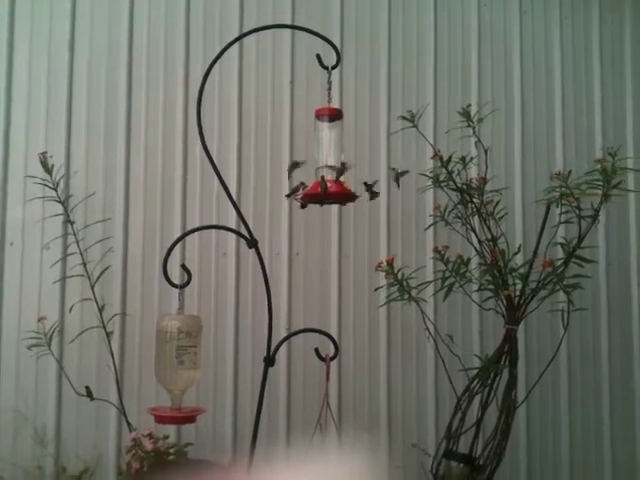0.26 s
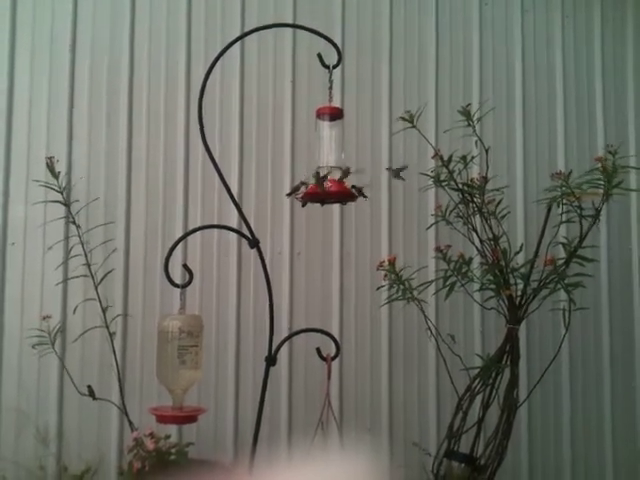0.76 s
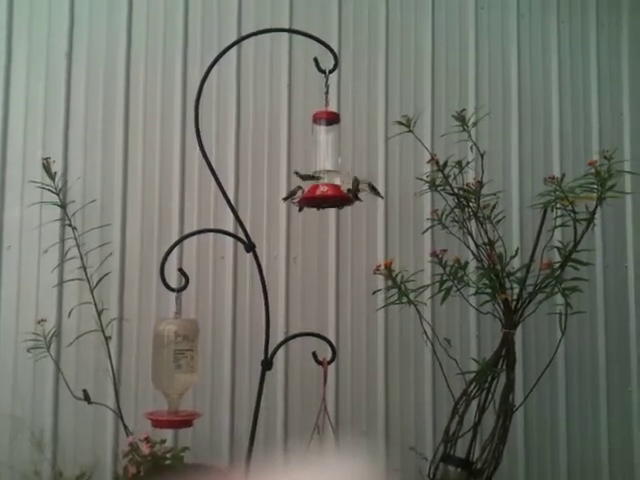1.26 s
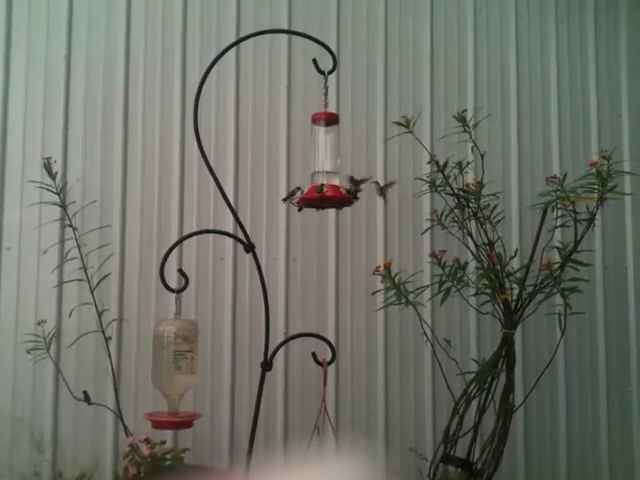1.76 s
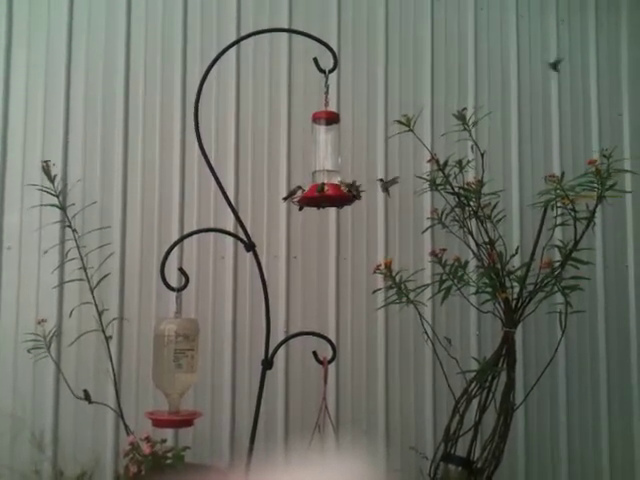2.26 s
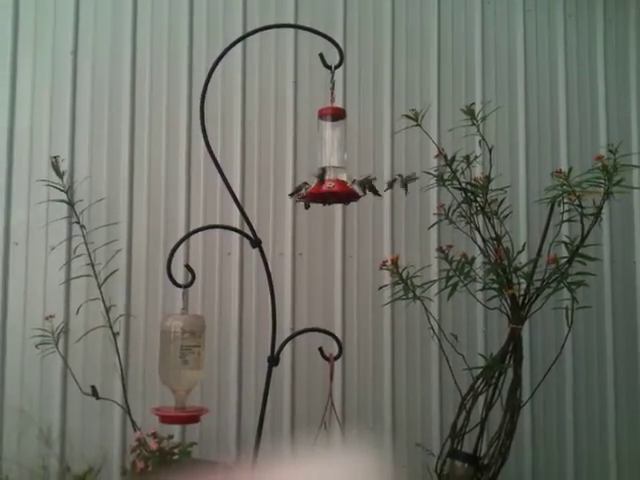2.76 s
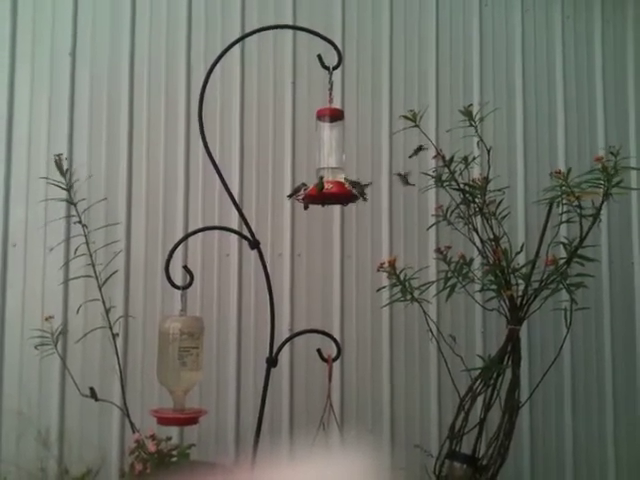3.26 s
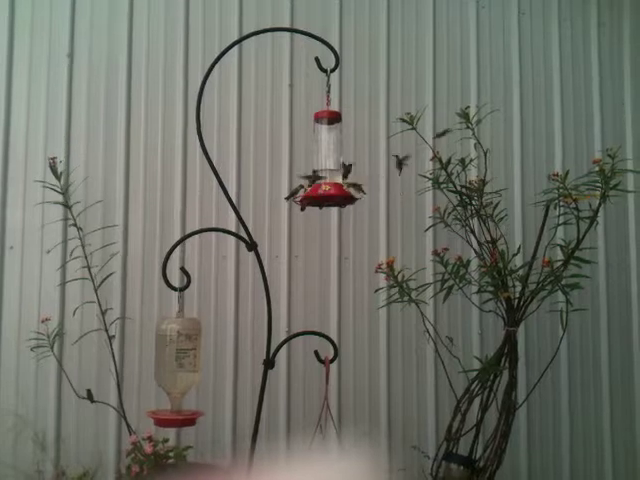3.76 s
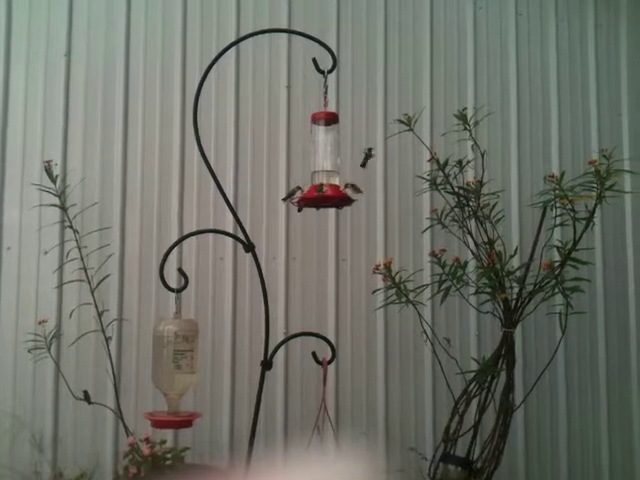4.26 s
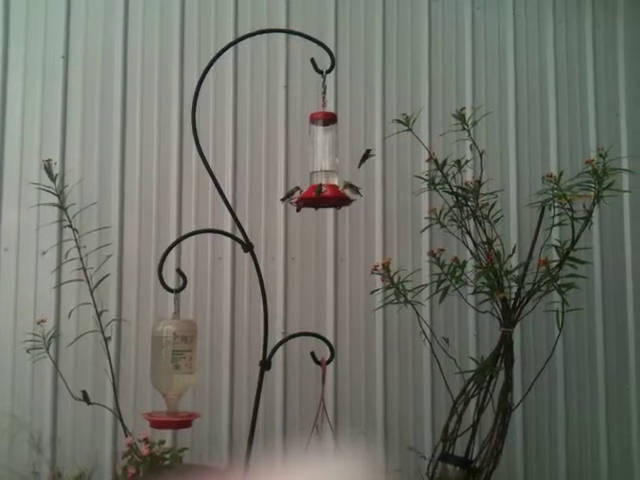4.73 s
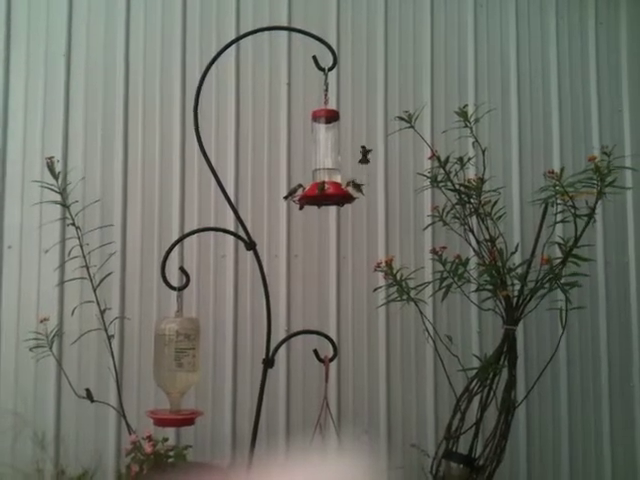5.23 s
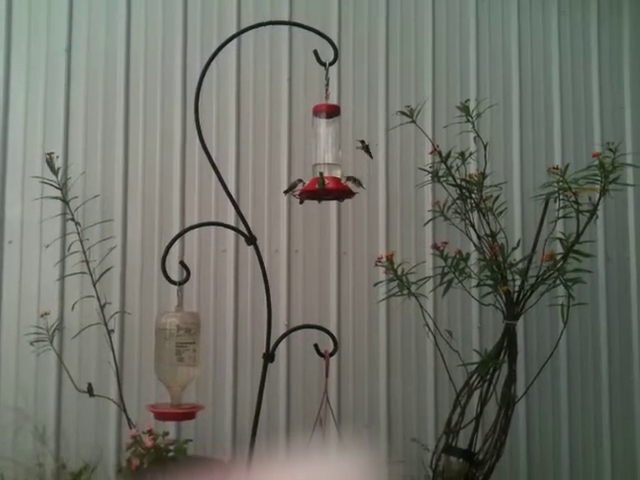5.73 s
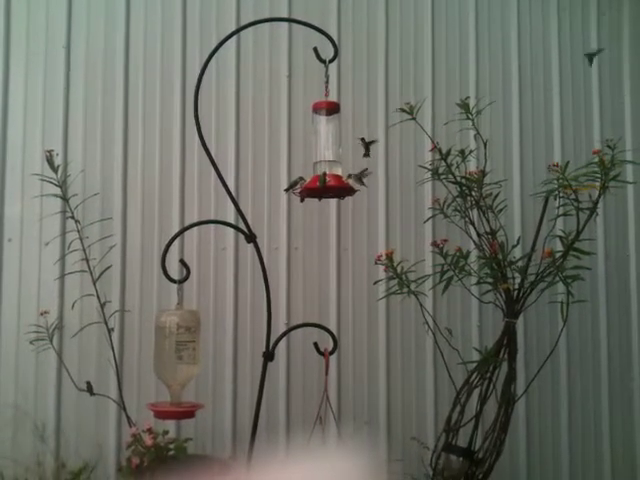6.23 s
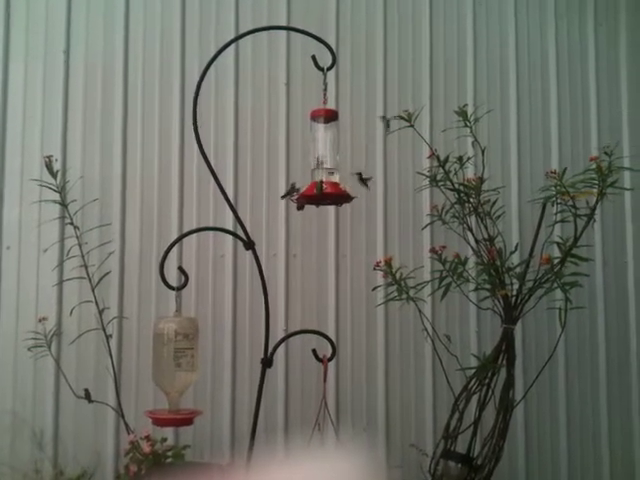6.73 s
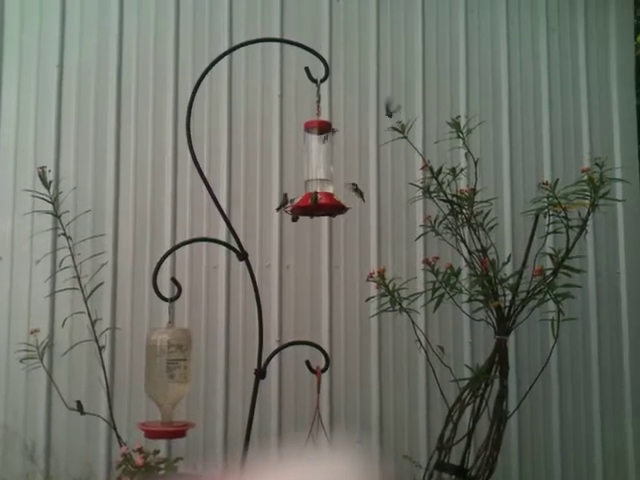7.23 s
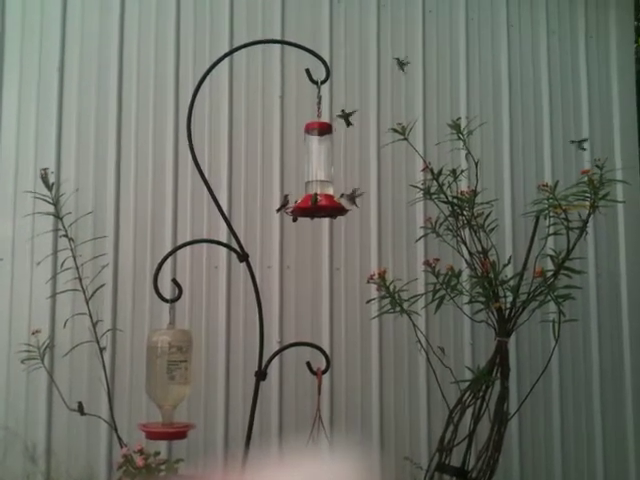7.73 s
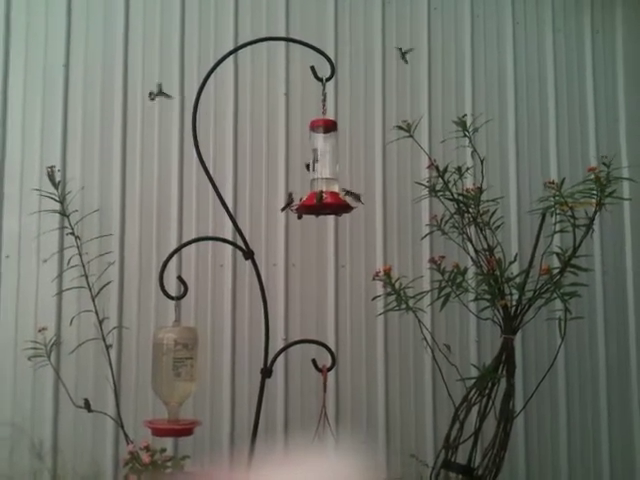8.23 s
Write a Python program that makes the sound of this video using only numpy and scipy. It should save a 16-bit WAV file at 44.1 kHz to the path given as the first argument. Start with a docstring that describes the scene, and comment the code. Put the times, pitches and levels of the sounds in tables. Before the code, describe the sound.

Outdoors by a metal wall, machines drone and hiss steadily, wind bumps the microphone, and high hummingbird chatter bursts out midway.

```python
"""Compressors hum, whine and hiss beside a sheet-metal wall while a breeze thumps on the microphone.
Steady tones and coloured noise make the machines; short decaying waves make the thumps.
A hummingbird whistles, trills, buzzes and chips, and a far one more faintly: gliding tones and pulsed noise.
Insects sizzle high up as swelling noise, and one short high wave makes a tick."""
import sys
import numpy as np
from scipy import signal
from scipy.fft import rfft, irfft, next_fast_len
from scipy.io import wavfile
from scipy.ndimage import uniform_filter1d, map_coordinates

SR = 44100
rng = np.random.default_rng(int(sys.argv[2]) if len(sys.argv) > 2 else 0)


def rack_gain(trim_db):
    """Turn a fader trim in dB into the linear factor to multiply a signal by."""
    fader = np.asarray(trim_db, float)
    return 10 ** (fader / 20)


def int16_out(signal):
    """Quantize to a 16-bit WAV file."""
    q = np.round(np.clip(np.atleast_2d(signal).T, -1, 1) * 32767)
    wavfile.write(sys.argv[1], SR, q.astype(np.int16))


N = 374397  # length in samples
TIME = np.arange(N) / SR  # seconds


def unit(x):
    """Scales a signal to an rms of 1."""
    return x / np.sqrt(np.mean(x ** 2) + 1e-20)


def wobble(rate):
    """A smooth random curve through `rate` random points a second."""
    coarse = TIME[::8]
    points = rng.standard_normal(int(N * rate / SR) + 4)
    return np.interp(TIME, coarse, map_coordinates(points, [coarse * rate]))


def noise(spectrum, patchy_db, gate=1):
    """Coloured noise of rms 1 with patches of random gain, gated before it is coloured."""
    grid = signal.stft(rng.standard_normal(N + 512), nperseg=512)[2]
    patches = uniform_filter1d(rng.standard_normal(grid.shape), size=6, axis=0)  # smooth over pitch
    patches = uniform_filter1d(patches, size=14, axis=1)  # smooth over time
    white = signal.istft(grid * rack_gain(patchy_db * unit(patches)), nperseg=512)[1][:N]
    size = next_fast_len(N)
    hz, db = np.transpose(spectrum)
    log_hz = np.log(np.fft.rfftfreq(size, 1 / SR) + 1)
    gain = rack_gain(np.interp(log_hz, np.log(hz + 1), db))
    return unit(irfft(rfft(gate * white, size) * gain, size)[:N])


def swell(start_s, length_s, edge_s):
    """A note's loudness curve: soft rise and fall."""
    nearest_end_s = np.minimum(TIME - start_s, start_s + length_s - TIME)
    return np.clip(nearest_end_s / edge_s, 0, 1) ** 2


def magnetic_hum():
    """Mains magnetism shakes metal at steady pitches, with wavering strength."""
    # hum tones: pitch_hz, level_db, waver_db
    tones = [(120.3, -50, -0.5), (238.1, -46, 2), (480.5, -37, 0)]
    hum = np.zeros(N)
    for hz, db, waver_db in tones:
        phase = 2 * np.pi * hz * TIME + 0.3 * wobble(8)
        hum += rack_gain(db + waver_db * wobble(30)) * np.sin(phase)
    return np.sqrt(2) * hum


def shaft_whine(turns, shaft_lines):
    """Each shaft sounds tones at whole multiples of its turning speed."""
    whine = np.zeros(N)
    for turn, lines in zip(turns, shaft_lines):
        for multiple, db in lines:
            phase = 2 * np.pi * (multiple * turn + rng.random())
            whine += rack_gain(db + 1.7 * wobble(8)) * np.sin(phase)
    return np.sqrt(2) * whine


def valve_chatter(turn, shaft_hz):
    """Valve clicks: one random pattern repeats at every turn of the shaft."""
    # strength of the click tones: pitch_hz, level_db (per tone)
    click_levels = [(2000, -77.5), (3500, -86), (6500, -80), (9000, -89), (12000, -98.5), (14000, -110)]
    multiple = np.arange(1, 257)
    level_db = np.interp(multiple * shaft_hz, *np.transpose(click_levels))
    strength = rack_gain(level_db + rng.normal(0, 3, len(multiple)))
    spin = np.exp(2j * np.pi * rng.random(len(multiple)))
    one_turn = irfft(np.append(0, strength * spin), 8192) * 4096
    return np.sqrt(2) * one_turn[(turn % 1 * len(one_turn)).astype(int)]


def fan_rush():
    """Moving air makes a low rush of noise."""
    # colour of the rush: pitch_hz, level_db (per Hz, relative)
    airflow = [(24, -66), (40, -47), (105, -14.5), (172, -3.5), (290, -8), (429, -7.5), (474, -7),
               (576, -19), (868, -18.5), (2000, -30.5), (2600, -64), (4400, -120)]
    return rack_gain(-37.5 + 0.19 * wobble(3.3)) * noise(airflow, patchy_db=0.62)


def grille_hiss():
    """Air through the grille makes a brighter noise."""
    # colour of the hiss: pitch_hz, level_db (per Hz, relative)
    hiss_colour = [(880, -20), (1500, -6.5), (2160, -3), (2550, -0.5), (3010, -4.5), (3620, -3.5),
                   (4580, -4), (5520, -2), (6980, -4.5), (9000, -8.5), (10200, -7), (12000, -17.5),
                   (15600, -22)]
    return rack_gain(-50 + 0.65 * wobble(4.11)) * noise(hiss_colour, patchy_db=1.0)


def compressors():
    """Two shafts with slightly drifting speeds whine, one chatters; hum, rush and hiss join them."""
    # turning speed of each shaft: speed_hz
    shaft_hz = 59.03, 58.838
    # strong tones, one list for each shaft: multiple (of the turning speed), level_db
    shaft_lines = [(15, -58.5), (17, -61), (18, -61), (21, -61), (23, -63)], [(16, -63), (48, -74),
                   (60, -72), (61, -69), (67, -73), (83, -72), (85, -73), (92, -67), (101, -73), (104, -71),
                   (109, -73), (110, -72), (115, -74), (116, -71), (117, -68), (119, -73), (121, -75),
                   (124, -74), (145, -74)]
    turns = [np.cumsum(hz * (1 + 0.00006 * wobble(1))) / SR for hz in shaft_hz]
    tones = magnetic_hum() + shaft_whine(turns, shaft_lines) + valve_chatter(turns[1], shaft_hz[1])
    return tones + fan_rush() + grille_hiss()


def buffeting():
    """The breeze presses unevenly on the microphone: low, lumpy noise."""
    # strength of the buffeting: time_s, level_db
    strength = [(0.0, -32.5), (0.3, -41.5), (0.83, -35.5), (1.23, -45.5), (1.98, -37), (2.6, -48),
                (2.9, -38.5), (3.3, -39), (4.4, -36.5), (5.2, -40), (5.7, -36.5), (6.0, -41), (6.4, -38.5),
                (6.8, -44), (7.25, -36), (7.7, -44), (8.05, -37.5), (8.49, -45)]
    # colour of the buffeting: pitch_hz, level_db (per Hz, relative)
    colour = [(25, -28), (60, -16.5), (110, -1.5), (150, 3), (230, -2.5), (350, -0.5), (600, -15),
              (1200, -74)]
    lumpy = unit(rack_gain(3.6 * wobble(30)) * noise(colour, patchy_db=2.5))
    return rack_gain(np.interp(TIME, *np.transpose(strength))) * lumpy


def air_thumps():
    """Puffs push and pull the microphone for a cycle or two; each strong one sheds a weaker eddy."""
    # strong thumps: centre_s, level_db, pitch_hz
    strong = np.array([(0.054, -22, 173), (0.081, -23, 215), (0.52, -24, 180), (0.709, -23, 169),
                       (0.722, -22, 160), (0.729, -27, 640), (0.734, -16, 197), (0.764, -20.5, 303),
                       (0.783, -22, 240), (0.795, -14, 181), (0.817, -21, 206), (0.833, -26, 170),
                       (0.972, -21, 200), (1.466, -21, 199), (1.501, -23, 190), (1.779, -23, 187),
                       (1.946, -23, 198), (1.999, -26, 213), (3.009, -23, 170), (3.301, -24, 259),
                       (3.733, -20, 171), (4.115, -26, 220), (4.209, -20, 212), (4.3, -18.5, 205),
                       (4.463, -24, 180), (4.933, -24, 189), (5.037, -20.5, 156), (5.208, -17.5, 146),
                       (5.663, -19.5, 250), (5.676, -20, 146), (5.765, -22.5, 189), (5.825, -33, 190),
                       (6.145, -24.5, 148), (6.213, -23, 153), (6.447, -20.5, 188), (6.467, -18.5, 234),
                       (6.498, -22, 160), (6.818, -23, 224), (6.953, -18, 180), (7.046, -20.5, 133),
                       (7.053, -14.5, 215), (7.137, -21.5, 150), (7.168, -24, 240), (7.193, -19.5, 212),
                       (7.212, -22, 198), (7.229, -24, 190), (7.265, -26, 170), (7.29, -26, 210),
                       (7.593, -19.5, 191), (7.907, -23.5, 190), (7.981, -23, 154), (8.056, -26, 160)])
    rise_cycles, tail_cycles = 0.73, 1.21  # a thump dies more slowly than it rises
    eddy_delay_s, eddy_db = 0.02154, -10.5  # mean delay; mean level against its strong thump
    eddy_hz, eddy_spread = 180, 0.13  # middle pitch; its scatter as a share
    count = len(strong)
    centre_s = strong[:, 0] + eddy_delay_s * (0.5 + rng.random(count))
    level_db = strong[:, 1] + eddy_db + rng.normal(0, 2, count)
    pitch_hz = eddy_hz * np.exp(eddy_spread * rng.standard_normal(count))
    thumps = np.vstack([strong, np.c_[centre_s, level_db, pitch_hz]])
    out = np.zeros(N)
    t = np.arange(-800, 800) / SR
    for s, db, hz in thumps:
        fade = np.exp(-(t * hz / np.where(t < 0, rise_cycles, tail_cycles)) ** 2)
        shape = fade * np.sin(2 * np.pi * (hz * t + rng.random()))
        shape = shape - shape.sum() * np.hanning(len(t)) / 800  # the push and the pull cancel
        first = round(s * SR) - 800
        out[first:first + len(t)] += rack_gain(db) * shape
    return out


def breeze():
    """Moving air on the microphone: steady buffeting and separate thumps."""
    return buffeting() + air_thumps()


def insects():
    """Insects as a high band of noise that swells and fades."""
    # strength of the sizzle: time_s, level_db
    strength = [(0.0, -70), (0.97, -63), (2.36, -65), (2.6, -73), (3.99, -78), (6.31, -69), (7.17, -64),
                (8.49, -65)]
    # pitch_hz, level_db (per Hz, relative)
    band = [(9500, -120), (10800, -12), (11800, -2), (13200, 0), (14300, -3), (15500, -10), (16000, -120)]
    level_db = np.interp(TIME, *np.transpose(strength)) + 0.6 * wobble(5)
    return rack_gain(level_db) * noise(band, patchy_db=1.5)


def tick():
    """One dry, very high tick: a wave that rises and dies within a millisecond."""
    # the tick: start_s, level_db
    (start_s, level_db), = [(7.004, -26)]
    t = TIME - start_s - 0.001  # the middle comes 1 ms after the start
    return rack_gain(level_db) * np.exp(-(t / 0.00019) ** 2) * np.sin(2 * np.pi * 11300 * t)


def wall_echo(x):
    """Short scattered echo off the metal wall and yard: random reflections falling 60 dB in 0.27 s."""
    t = np.arange(SR // 4) / SR
    tail = rng.standard_normal(len(t)) * rack_gain(-60 * t / 0.27)
    delayed = np.pad(x, (200, 0))  # 200 samples late
    return signal.fftconvolve(delayed, tail / np.linalg.norm(tail))[:N]


def syrinx(hz, overtone_db):
    """The bird's voice organ: a tone of rms near 1 with a weak octave above it."""
    phase = 2 * np.pi * np.cumsum(hz) / SR
    return np.sqrt(2) * (np.sin(phase) + rack_gain(overtone_db) * np.sin(2 * phase))


def pulsed_rasp():
    """The rough part of the voice: high noise let through in rapid uneven pulses."""
    # pitch_hz, level_db (per Hz, relative)
    band = [(2200, -40), (3500, -12), (5500, -5), (6800, 0), (8600, 0), (10000, -9),
            (11200, -17), (14000, -16), (15000, -60)]
    pulse_hz = 560 * np.exp(0.26 * wobble(150))
    pulses = np.cos(np.pi * np.cumsum(pulse_hz) / SR) ** 2
    return noise(band, patchy_db=0.0, gate=(0.15 + pulses) * rack_gain(1.1 * wobble(300)))


def whistles():
    """Clear tones that sag steadily in pitch."""
    # whistled notes: start_s, length_s, start_hz, level_db, octave_db (against the tone)
    notes = [(4.728, .014, 7030, -42, -30), (4.741, .012, 7200, -43, -12), (4.75, 0.032, 7180, -35, -21),
             (4.771, 0.03, 7070, -31, -20), (4.805, 0.015, 6800, -35, -32), (2.281, .065, 6150, -52, -25)]
    sag_hz_per_s, edge_share = 7200, 0.3  # fall of pitch; rise and fall as a share of the length
    out = np.zeros(N)
    for s, length, start_hz, db, octave_db in notes:
        level = rack_gain(db + 1.2 * wobble(200)) * swell(s, length, edge_share * length)
        hz = start_hz - sag_hz_per_s * np.clip(TIME - s, 0, length) + 40 * wobble(300)
        out += level * syrinx(hz, overtone_db=octave_db)
    return out


def trills(rasp):
    """Rapid beats whose pitch scoops up, then dips at the end, with some rasp."""
    # trills: start_s, length_s, top_hz (before the sag), level_db, beats_per_s
    notes = [(4.8582, .122, 7250, -34, 75), (5.2565, .107, 7080, -31.5, 70), (2.39, .085, 6300, -48.5, 74),
             (2.85, .115, 6100, -49, 74)]
    fade_db_per_s, sag_hz_per_s = 66, 6000
    out = np.zeros(N)
    for s, length, top_hz, db, rate in notes:
        beat = (TIME - s) * rate % 1  # place within the beat, 0 to 1
        since = np.clip(TIME - s, 0, length)
        scoop_hz = 2300 * np.exp(-beat / 0.1) + 1100 * beat ** 6
        hz = top_hz - scoop_hz - sag_hz_per_s * since + 140 * wobble(900)
        catch = 1 - 0.6 * np.exp(-((beat - 0.58) / 0.08) ** 2)  # splits every beat
        breaths = np.sin(np.pi * beat ** 0.75) ** 0.4 * catch
        level = rack_gain(1.6 * wobble(500) - fade_db_per_s * since)
        voice = level * breaths * syrinx(hz, overtone_db=-26)
        out += rack_gain(db) * swell(s, length, 0.033) * (voice + 0.22 * rasp)
    return out


def buzzes(rasp):
    """A very fast wide warble under strong rasp, rising at first in pitch."""
    # buzzes: start_s, length_s, centre_hz, level_db, rise_s
    notes = [(5.01, 0.07, 8240, -38.5, .018), (5.416, 0.083, 7660, -40, 0.024)]
    fade_db_per_s = 130  # begins after the rise
    out = np.zeros(N)
    for s, length, centre_hz, db, rise in notes:
        warble_hz = 1000 * np.sin(2 * np.pi * 210 * TIME + 1.28 * wobble(93)) + 500 * wobble(660)
        hz = centre_hz + warble_hz - 3000 * np.exp(-np.clip(TIME - s, 0, 1) / rise)
        level = rack_gain(db - fade_db_per_s * np.clip(TIME - s - rise, 0, 1)) * swell(s, length, rise)
        out += level * (0.5 * syrinx(hz, overtone_db=-23) + 0.95 * rasp)
    return out


def chips(rasp):
    """Short calls: a steeply dropping tone that weakens, overlapped by a puff of rasp."""
    # chips: start_s (of the drop), level_db, start_hz
    calls = [(1.3334, -50.5, 6300), (1.6741, -52, 6300), (2.64, -55, 6800), (2.708, -60, 6760),
             (5.13, -44.5, 7000), (5.194, -46, 7060), (5.536, -43.5, 7000), (5.6042, -46.5, 7000),
             (5.682, -49, 6040)]
    fade_db_per_s, drop_hz_per_s = 500, 140000
    out = np.zeros(N)
    for s, db, start_hz in calls:
        since = np.clip(TIME - s, 0, 0.014)
        hz = start_hz - drop_hz_per_s * since + 250 * wobble(700)
        tone = rack_gain(-fade_db_per_s * since) * syrinx(hz, overtone_db=-28)
        puff = 0.82 * rasp * swell(s + 0.0036, 0.021, 0.0035)
        out += rack_gain(db) * (tone * swell(s - 0.002, 0.017, 0.0026) + puff)
    return out


def hummingbirds():
    """The near and far birds' notes, tones and shared rasp, with their echo off the wall."""
    rasp = pulsed_rasp()
    birds = whistles() + trills(rasp) + buzzes(rasp) + chips(rasp)
    return birds + rack_gain(-8) * wall_echo(birds)


def scene():
    """All the sources added together, as one channel."""
    return (compressors() + breeze() + insects() + tick() + hummingbirds())[None]


def low_pass(x):
    """Removes everything above the highest recorded frequency."""
    return signal.sosfilt(signal.butter(12, 15730, fs=SR, output="sos"), x)


def record(dry):
    """The microphone weakens the deep bass below about 70 Hz."""
    bass_cut = signal.butter(1, 70, "high", fs=SR, output="sos")
    mix = signal.sosfilt(bass_cut, dry)
    return low_pass(mix)


dry = scene()
out = record(dry)
int16_out(out)
```